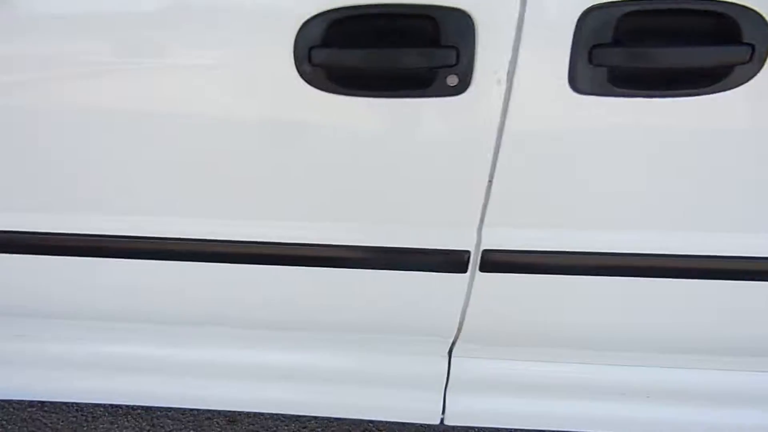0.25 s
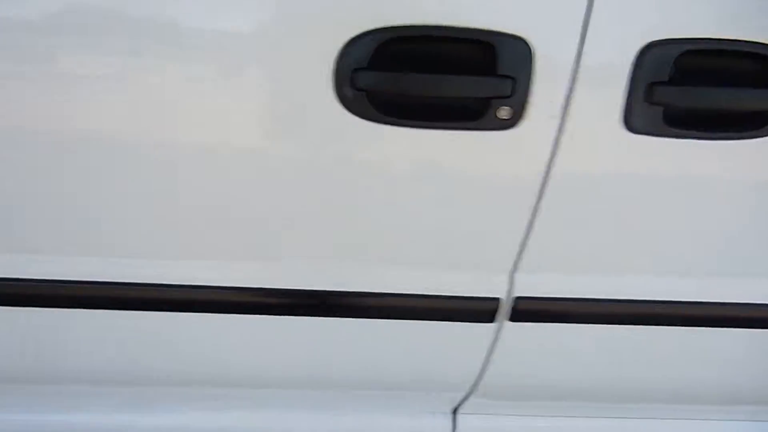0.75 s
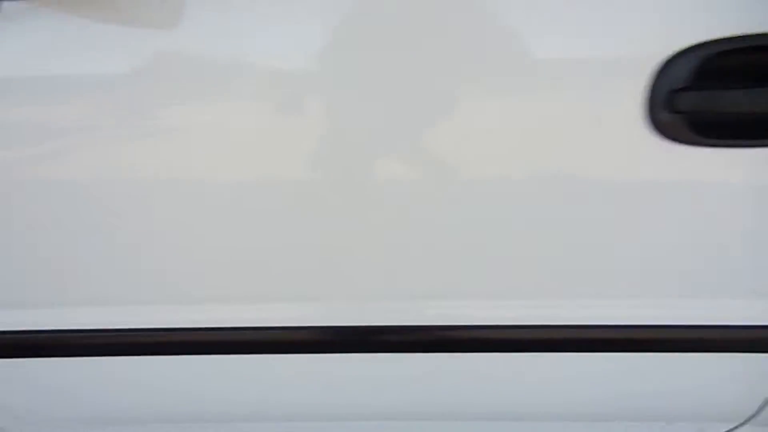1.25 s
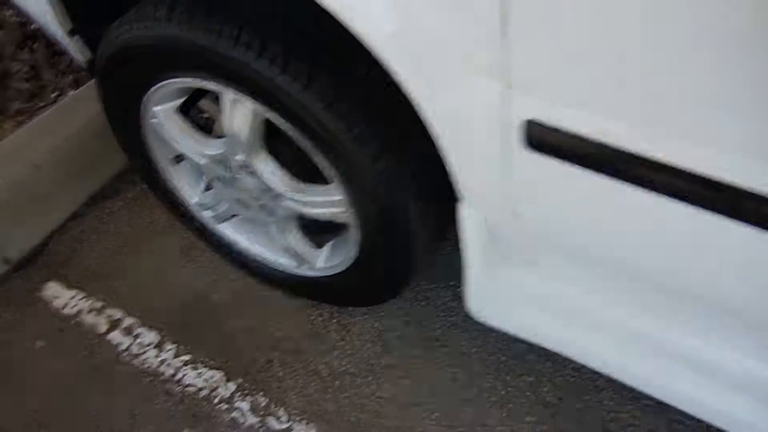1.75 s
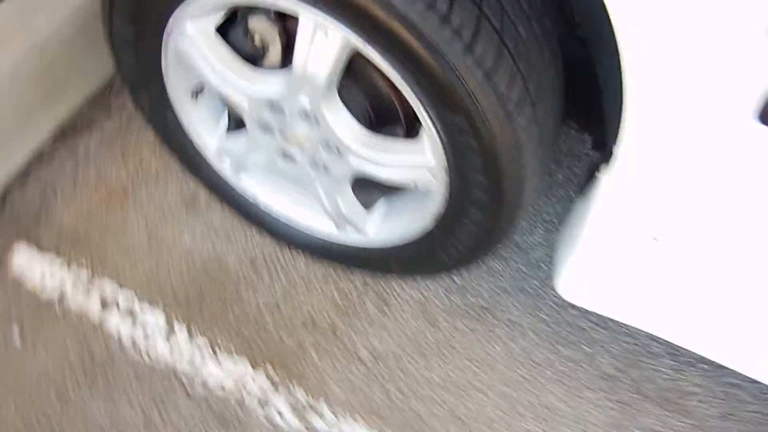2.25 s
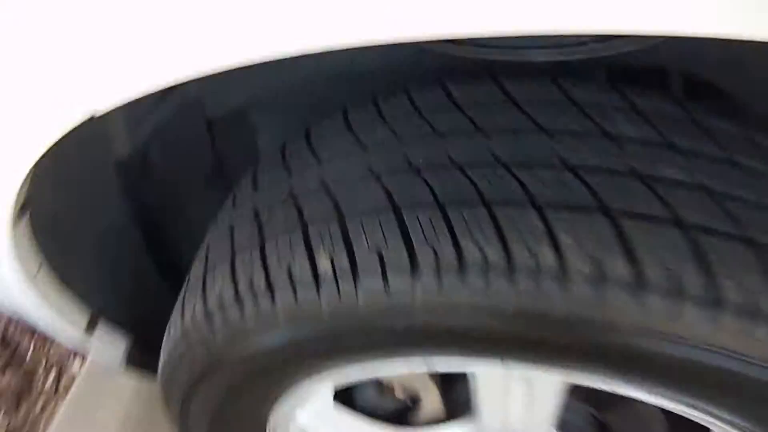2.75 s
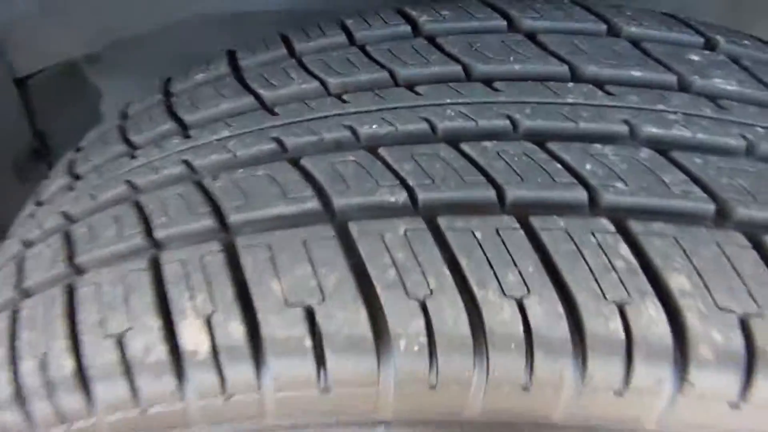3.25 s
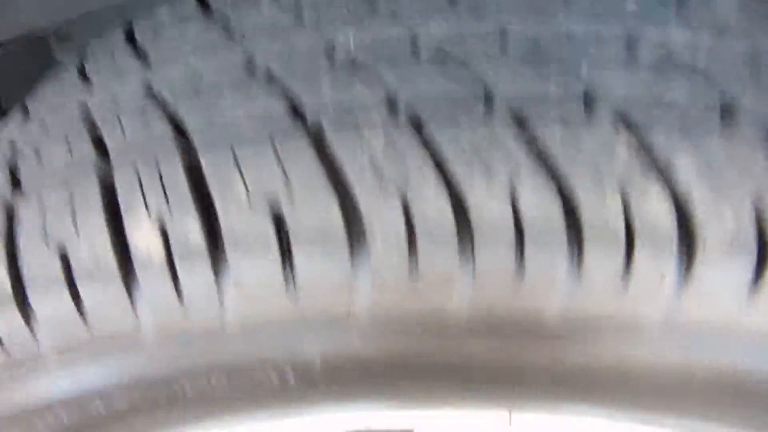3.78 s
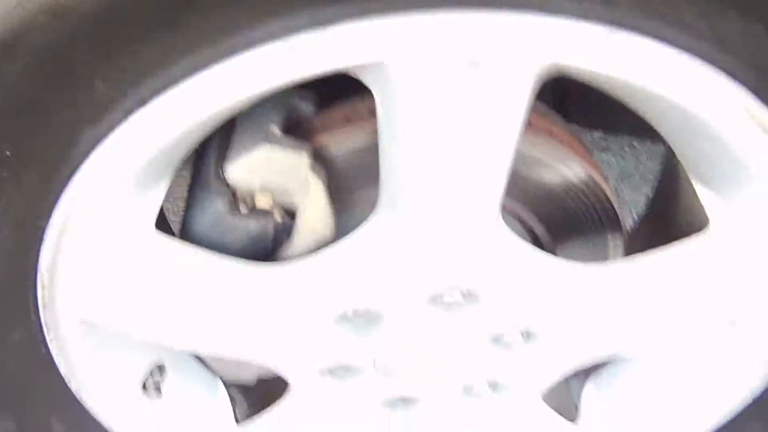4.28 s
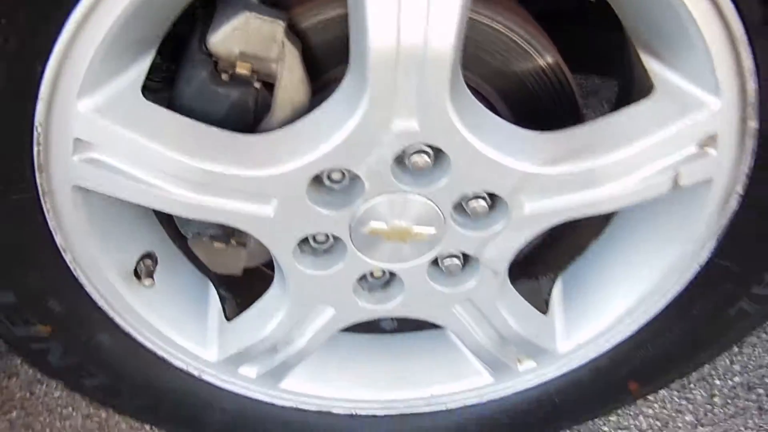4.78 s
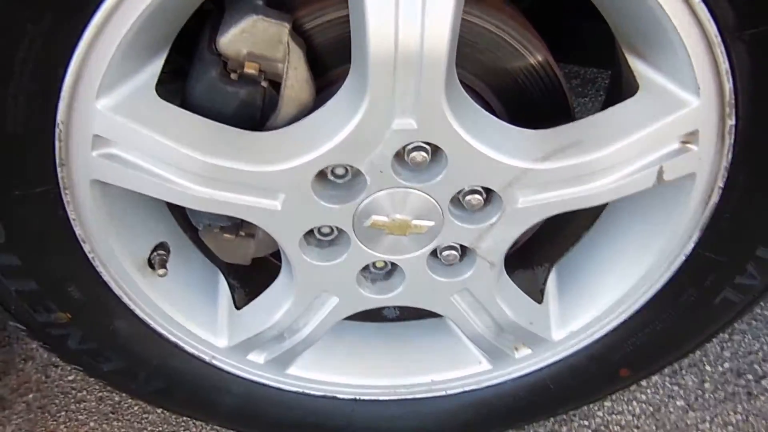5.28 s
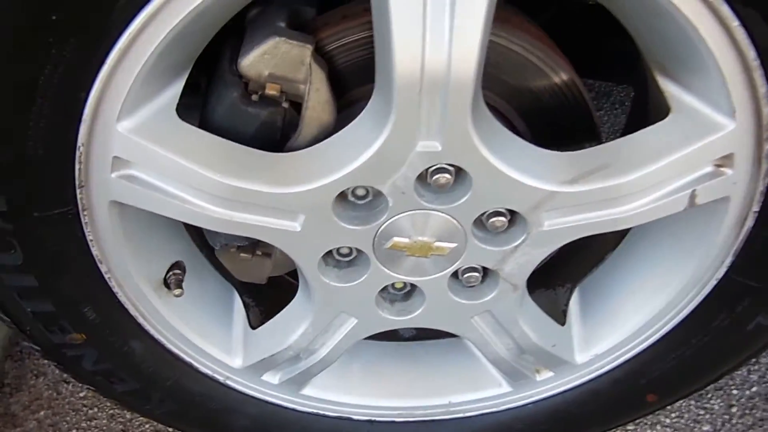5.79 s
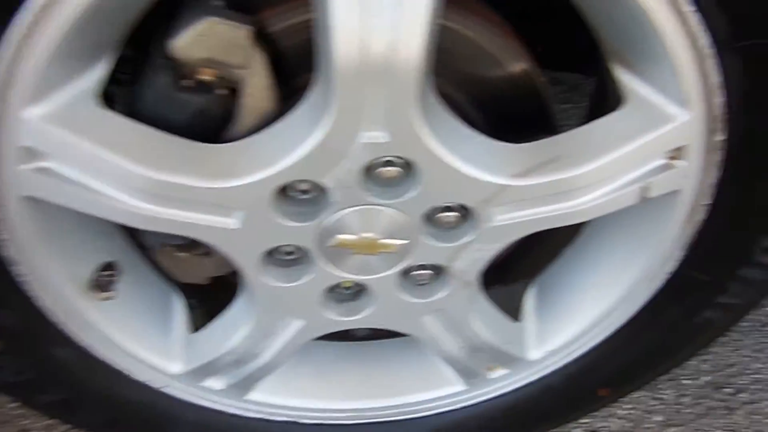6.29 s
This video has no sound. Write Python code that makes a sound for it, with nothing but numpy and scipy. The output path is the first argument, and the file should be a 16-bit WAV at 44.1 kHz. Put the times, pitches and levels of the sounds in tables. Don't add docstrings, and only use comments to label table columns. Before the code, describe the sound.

At 0 s a van door slams right beside a handheld stereo microphone outdoors, overloading it: several blows merge within about 0.15 s into a heavy, boxy thud with noisy sheet metal and bright trim rattle, the cabin boom fading by about 0.5 s. Until 1.2 s only faint idle, thin whine, low traffic rumble and soft air buffeting remain. From 1.3 s the engine's airy fan and belt rush swells; a light tick comes at 1.4 s. Faint scuffs fall around 1.6 and 2.3 s, a click at 2.5 s, then a gritty crunch at 2.9 s with a low tick. Over the tyre, 3 to 4 s, the rush is loudest and broad, with a wavering whine near 1.2 kHz. At 4.3 to 4.45 s a longer crackling shoe scrape includes a loud tick. The sound turns more hollow and resonant at the wheel, then idles steadily to 6.5 s, with one faint scuff at 6.2 s.

```python
import sys
import numpy as np
from scipy import signal
from scipy.fft import rfft, irfft, next_fast_len
from scipy.io import wavfile
from scipy.ndimage import uniform_filter1d, map_coordinates

SR = 44100
rng = np.random.default_rng(int(sys.argv[2]) if len(sys.argv) > 2 else 0)


def materialize(psi):
    bounded = np.clip(np.atleast_2d(psi).T, -1, 1)
    quanta = np.round(bounded * 32767).astype(np.int16)
    wavfile.write(sys.argv[1], SR, quanta)


def natural_amplitude(level_db):
    exponent = np.asarray(level_db, float) / 20
    return 10 ** exponent


N = 287973


def unit(x):
    return x / np.sqrt(np.mean(x ** 2) + 1e-20)


def along(points, hz):
    f, v = np.transpose(points)
    return np.interp(np.log(hz + 1), np.log(f + 1), v)


def curves(rows):
    s, *cols = np.transpose(rows)
    return [np.interp(np.arange(N) / SR, s, c) for c in cols]


def wobble(rate):
    return map_coordinates(rng.standard_normal(int(N * rate / SR) + 4), [np.arange(N) * rate / SR])


def filtered(x, response):
    n = x.shape[-1]
    m = next_fast_len(n + 8192)
    return irfft(rfft(x, m) * response(np.fft.rfftfreq(m, 1 / SR)), m)[..., :n]


def resonance(f, centre_hz, width_hz):
    return 1j * f * width_hz / (centre_hz ** 2 - f * f + 1j * f * width_hz + 1e-9)


def pair(n, gain, alike, patchy_db=0):
    z = signal.stft(rng.standard_normal((2, n + 512)), nperseg=512)[2]
    field = uniform_filter1d(rng.standard_normal(z.shape[1:]), size=6, axis=0)
    field = uniform_filter1d(field, size=12, axis=1)
    noise = signal.istft(z * natural_amplitude(patchy_db * unit(field)), nperseg=512)[1][:, :n]
    turn = lambda hz: np.arccos(np.clip(along(alike, hz), -1, 1)) / 2
    mid, side = filtered(noise, lambda hz: gain(hz) * [np.cos(turn(hz)), np.sin(turn(hz))])
    return unit(np.array([mid + side, mid - side]))


def panned(db):
    return natural_amplitude(np.array([db / 2, -db / 2]))


def bursts(rows, alike, pan_db):
    out, t = np.zeros((2, N + SR)), np.arange(SR // 4) / SR
    for s, db, hz, width_hz, t60, rise in rows:
        puff = pair(len(t), np.ones_like, alike) * natural_amplitude(-60 * t / t60) * (1 - np.exp(-t / rise))
        puff = filtered(puff, lambda f: resonance(f, hz, width_hz))
        out[:, round(s * SR):][:, :len(t)] += natural_amplitude(db) * puff / np.abs(puff).max()
    return panned(pan_db)[:, None] * out[:, :N]


def knocks(rows, t60, rise):
    out, t = np.zeros((2, N)), np.arange(SR // 16) / SR
    for (s, db, hz), phase in zip(rows, rng.normal(0, 0.22, (len(rows), 2, 1))):
        ring = natural_amplitude(db - 60 * t / t60) * (1 - np.exp(-t / rise)) * np.sin(2 * np.pi * hz * t + phase)
        out[:, round(s * SR):][:, :len(t)] -= ring
    return panned(-1.7)[:, None] * out


def door_thud(blows):
    # [f/Hz, level/dB, 60 dB decay/s]
    modes = [(27.6, -21, 0.56), (40, -9, 0.52), (55, -10, 0.52), (84, 1, 0.25), (102.5, -18, 0.45),
             (127, -7.5, 0.27), (179, -8, .25), (209.6, -2, 0.19), (238, -3, 0.091), (267, 6.5, .22),
             (300, -6, 0.19), (364, -7, 0.2), (416, -13, 0.21), (513, -15, 0.25), (666, -9, 0.088),
             (800, -6, 0.078), (1111, -0.5, 0.095)]
    out, t = np.zeros((2, N)), np.arange(SR // 2) / SR
    strengths_db = rng.normal(0, 3.8, (len(blows), len(modes))) + rng.normal(0, 1.2, (2, 1, len(modes)))
    fade_db = np.array([db - 60 * t / t60 for _, db, t60 in modes])
    ringing = natural_amplitude(fade_db) * np.sin(2 * np.pi * np.array([hz * t for hz, _, _ in modes]))
    for k, (s, db, way) in enumerate(blows):
        begin = round(s * SR)
        out[:, begin:begin + len(t)] += way * natural_amplitude(db - 18.5) * natural_amplitude(strengths_db[:, k]) @ ringing
    return out


def panel_shake(blows, alike):
    # [f/Hz, level/dB per Hz]
    colour = [(100, -5.5), (250, -2), (700, -4), (1500, -9), (3000, -14), (8000, -27), (15700, -45)]
    base_db, growth, settle_db_per_s, t60_s = -3.5, 0.6, 85, .13
    t, energy = np.arange(SR // 2) / SR, np.zeros(SR)
    for s, db, _ in blows:
        begin = round(s * SR)
        panel_db = base_db + growth * db - settle_db_per_s * s
        energy[begin:begin + len(t)] += natural_amplitude(2 * (panel_db - 60 * t / t60_s))
    return np.sqrt(energy) * pair(SR, lambda hz: natural_amplitude(along(colour, hz)), alike)


def cabin_boom():
    # [f/Hz, level/dB per Hz]
    colour = [(30, -6), (90, 1), (250, -1.5), (500, -7.5), (1200, -38)]
    t = np.arange(SR // 2) / SR
    return natural_amplitude(-15 - 60 * t / 0.69) * pair(len(t), lambda hz: natural_amplitude(along(colour, hz)), [(40, 0.97), (200, 1.0)])


def trim_rattle(alike):
    # [t/s, level/dB, f/Hz]
    rattles = [(.002, -1, 6000), (.008, 9, 11000), (.019, 5.5, 7000), (0.029, 7, 9000), (.038, -2, 6000),
               (0.0447, 10.5, 9400), (.051, -8, 9500), (0.0666, 0, 8500), (0.0775, -7, 8000),
               (0.09, -14, 12000), (.1012, -0.5, 5000), (0.106, -6, 6400), (0.1096, 0, 4000)]
    t60_s, shrink_per_s, rise_s = 0.032, 6.8, .0006
    puffs = [(s, db, hz, hz, t60_s * np.exp(-shrink_per_s * s), rise_s) for s, db, hz in rattles]
    return bursts(puffs, alike, pan_db=0.5)


def slam():
    # [t/s, level/dB, direction/-1 or 1]
    blows = [(0, 5, -1), (.012, 7, 1), (.024, 8, 1), (.035, 9, -1), (.046, 2, -1), (.06, 3, 1),
             (.072, -5.5, 1), (.084, -16, -1), (.096, 3, 1), (.112, -8, -1), (.13, -17, 1),
             (.165, -18.5, 1)]
    # [f/Hz, likeness/-1..1]
    alike = [(60, 0.77), (130, 0.98), (290, 0.98), (640, 0.96), (1410, 0.91), (3100, 0.64), (6820, 0.4),
             (15000, 0.29)]
    out = door_thud(blows)
    out[:, :SR] += panel_shake(blows, alike)
    out[:, :SR // 2] += cabin_boom()
    return out + trim_rattle(alike)


def firing(turns):
    # [multiple of crank pattern, level/dB]
    orders = [(2, -55), (3, -50), (4, -52.5), (5, -51.5)]
    low = natural_amplitude(-56.0) * np.sin(2 * np.pi * 1.2 * turns)
    for k, db in orders:
        lope_db, lope = 3 * wobble(3), .45 * wobble(5)
        low += natural_amplitude(db + 2 + lope_db) * np.sin(2 * np.pi * k * turns + lope)
    return low


def alternator(tyre_db):
    # [t/s, f/Hz, level/dB]
    track = [(0, 1118, -49), (1, 1137, -48), (1.35, 1180, -45.5), (2.1, 1145, -49.5), (2.75, 1195, -39.5),
             (3.3, 1177, -42), (4, 1210, -35.5), (4.8, 1210, -43), (6.53, 1197, -45.5)]
    whine_hz, whine_db = curves(track)
    spin = np.cumsum(whine_hz) / SR
    whine = 0
    for order, db in [(0.99, 2.5), (.51, -10.0)]:
        slip_db, drift = 2.2 * wobble(21.97), .6 * wobble(28)
        whine = whine + natural_amplitude(whine_db + db + slip_db) * np.sin(2 * np.pi * order * spin + drift)
    lagged = np.array([whine, np.roll(whine, shift=5)])
    return panned(-10 * natural_amplitude(tyre_db + 25)) * lagged


def bay(place, comb_db, patchy_db):
    broad, peaks, alike, balance, lag = place
    humps_db = lambda hz: sum(db * abs(resonance(hz, c, w)) ** 2 for c, w, db in peaks)
    paths = rng.standard_normal(600)
    comb = lambda hz: comb_db * np.interp(hz, np.arange(len(paths)) * 38, paths)
    rush = pair(N, lambda hz: natural_amplitude(along(broad, hz) + humps_db(hz) + comb(hz)), alike, patchy_db)
    delay = lambda hz: np.exp(np.outer([-1j, 1j], np.pi * hz * lag / SR))
    return filtered(rush, lambda hz: panned(along(balance, hz)) * delay(hz))


def bay_rush(turns, near_db, tyre_db, wheel_db):
    # broad colour [f/Hz, level/dB per Hz], cavity peaks [f/Hz, width/Hz, level/dB],
    # left-right likeness [f/Hz, likeness/-1..1], balance [f/Hz, left over right/dB], left lag [samples]
    flank = ([(71, -46), (120, -23.5), (255, -15.5), (339, -17), (391, -14), (530, -13), (1080, -7.5),
             (2070, -15.5), (2290, -13.5), (3660, -15), (15500, -22.5)], [(616, 36, 7.5), (1160, 75, 1.5),
             (2190, 110, 4), (2780, 90, 4), (7800, 60, 10)], [(60, -2), (130, 0.8), (290, 0.97), (640, 1.1),
             (1410, 2), (3100, -0.3), (6820, 0.26), (15000, -0.2)], [(60, 0.0), (110, 2), (200, -2),
             (380, -0.5), (700, -0.5), (1290, -2), (2380, -2), (4400, 0.5), (8120, 2.5), (15000, 1.0)],
             -2.46)
    tyre = ([(71, -48), (120, -23.5), (221, -13.5), (282, -14.5), (611, -8), (1100, -7.5), (1200, -6.5),
            (1950, -11), (3240, -9), (3970, -11), (15500, -15.5)], [(620, 24, 5.7), (820, 75, .4),
            (1020, 33, 1.9), (1300, 40, 2.3), (2330, 51, 3.9), (2910, 150, 2.2), (3350, 310, 3.8),
            (7340, 190, 3)], [(60, 0.97), (130, 0.99), (290, 0.97), (640, 1), (1410, 0.8), (3100, 0.61),
            (6820, 0.29), (15000, -0.34)], [(60, 0.0), (110, 0.5), (200, -1.5), (380, -0.5), (700, -0.5),
            (1290, -2), (2380, -3.5), (4400, -2), (8120, -2), (15000, -0.5)], -2.74)
    wheel = ([(71, -54), (120, -14.5), (282, -21.5), (407, -10), (780, -9.5), (1220, -5.5), (1320, -11),
             (1440, -8), (2810, -8), (3820, -10), (15500, -17)], [(580, 55, 2.8), (1210, 160, 1.8),
             (1441, 113, 6.2), (2508, 70, 6.5), (2817, 73, 6.8), (3210, 93, 4.5), (4180, 80, 1.2),
             (4610, 54, 6.5), (6000, 80, 3.5), (7470, 90, 6.4), (9000, 1800, -2.5)], [(60, 0.97), (130, 1),
             (290, 1), (640, 0.97), (1410, 0.98), (3100, 0.6), (6820, -0.22), (15000, -0.047)], [(60, 0.0),
             (110, 0.0), (200, 0.0), (380, 0.5), (700, -2.5), (1290, 0.8), (2380, -2.5), (4400, -0.8),
             (8120, -1.0), (15000, 0.0)], 1.15)
    flank_db = -36 - 3.1 * np.maximum(near_db + 29, 0)
    rush = natural_amplitude(flank_db) * bay(flank, comb_db=1.8, patchy_db=0.5)
    rush += natural_amplitude(tyre_db) * bay(tyre, comb_db=1.5, patchy_db=1.0)
    rush += natural_amplitude(wheel_db) * bay(wheel, comb_db=2.0, patchy_db=0.0)
    clatter = natural_amplitude(0.14 * np.sin(2 * np.pi * turns) + 0.2 * wobble(9) + 0.39 * wobble(30))
    return clatter * rush


def engine():
    # [t/s, engine nearness/dB, share heard over the tyre, not through the wheel/0..1]
    walk = [(0, -54, .5), (1, -50, .9), (1.3, -41, .9), (1.6, -36, .45), (1.9, -31.5, .45), (2.2, -30, .2),
            (2.5, -28, 0.32), (2.8, -28, 0.7), (3.1, -26, 0.86), (3.4, -24, 0.91), (3.7, -23, 0.95),
            (4, -23, 0.56), (4.2, -24, .17), (4.8, -25, .1), (5.6, -25.5, 0.14), (6.53, -25.5, 0.12)]
    near_db, over = curves(walk)
    over = np.clip(over, .01, .99)
    tyre_db = near_db + 10 * np.log10(over)
    wheel_db = near_db + 10 * np.log10(1 - over)
    crank_hz, hunt_hz = 18, .4
    turns = np.cumsum(crank_hz + hunt_hz * wobble(1)) / SR
    return firing(turns) + alternator(tyre_db) + bay_rush(turns, near_db, tyre_db, wheel_db)


def feet_and_ticks():
    # [t/s, level/dB, f/Hz, 60 dB decay/s]
    scuffs = [(1.62, -32, 140, 0.31), (2.33, -29, 900, .03), (2.395, -28, 400, .08),
              (2.860, -18, 2800, .07), (2.861, -20, 600, .07), (2.862, -17, 12500, .05),
              (4.322, -17, 2800, .07), (4.374, -12.5, 1300, 0.19), (4.380, -14, 3200, .15),
              (4.381, -18, 9000, .22), (6.219, -31.5, 308, 0.12)]
    # [t/s, peak/dB, f/Hz]
    grit = [(2.455, -28, 2000), (2.8612, -12, 870), (2.868, -14, 1000), (2.8785, -6, 1400),
            (2.887, -16, 1240), (2.899, -19, 1400), (4.324, -12, 2340), (4.331, -16, 1250),
            (4.337, -19, 2500), (4.3892, -14, 3080), (4.393, -15, 1210), (4.405, -12, 2050),
            (4.411, -14, 2220), (4.419, -16, 1250), (4.4305, -13, 2070), (4.4405, -13.5, 2080)]
    # [t/s, peak/dB, f/Hz]
    ticks = [
        (1.3905, -22, 4200),
        (2.5445, -11.5, 2800),
        (2.9543, -9.5, 1100),
        (4.3983, -5, 2200),
    ]
    grit_ring = .017, .0007, -4, 3100, 2300
    tick_ring = .008, .0002, -.5, 7000, 13000
    wide, rise_share, crack_t60_s = 0.75, .08, .007
    puffs = [(s, db, hz, wide * hz, t60, rise_share * t60) for s, db, hz, t60 in scuffs]
    rings = 0
    for rows, (t60, rise, crack_db, crack_hz, width_hz) in [(grit, grit_ring), (ticks, tick_ring)]:
        puffs += [(s, db + crack_db, crack_hz, width_hz, crack_t60_s, .0001) for s, db, _ in rows]
        rings = rings + knocks(rows, t60, rise)
    return rings + bursts(puffs, [(600, 1.0), (2000, 0.84), (5000, 0.33)], pan_db=-3.0)


def air():
    # [f/Hz, level/dB per Hz]
    colour = [(8.8, -33), (15, -7), (63, -3.5), (88, 0.5), (166, -11), (222, -7.5), (300, -13.5),
              (390, -25), (660, -120)]
    rumble = pair(N, lambda hz: natural_amplitude(along(colour, hz)), [(60, 0.96)], patchy_db=3.0)
    puffs = pair(N, lambda hz: abs(resonance(hz, 24.4, 19)) ** 2, [(30, 0.72)])
    buffet_db, gust_db, gusts_per_s = -48, 3, 6
    return natural_amplitude(-47.5 + 2.0 * wobble(2.9)) * rumble + natural_amplitude(buffet_db + gust_db * wobble(gusts_per_s)) * puffs


def scene():
    return slam() + engine() + feet_and_ticks() + air()


def band_limit(x):
    return signal.sosfilt(signal.butter(12, 15690, fs=SR, output="sos"), x)


def record(dry):
    ceiling, knee = .79, 4.5
    clipped = dry / (1 + np.abs(dry / ceiling) ** knee) ** (1 / knee)
    return band_limit(clipped)


dry = scene()
out = record(dry)
materialize(out)
```